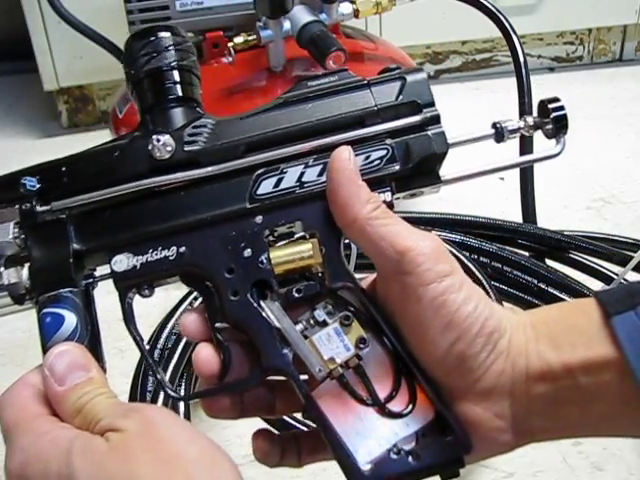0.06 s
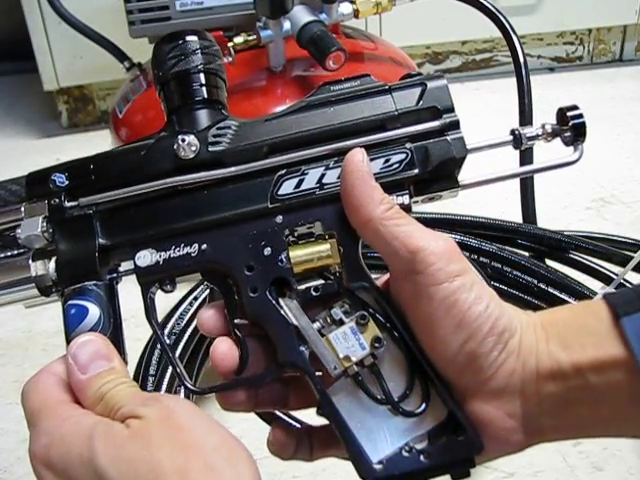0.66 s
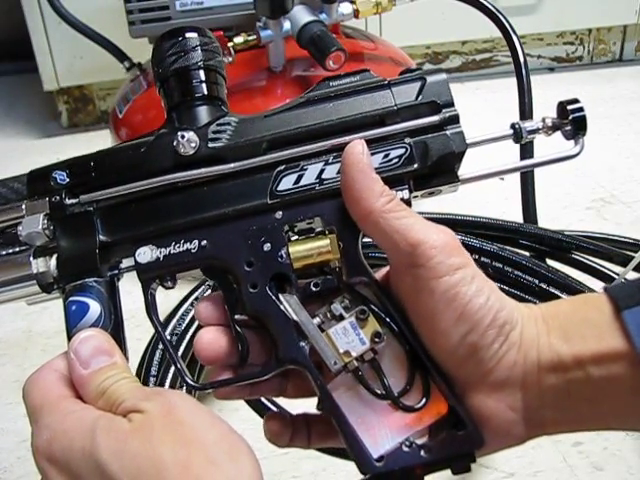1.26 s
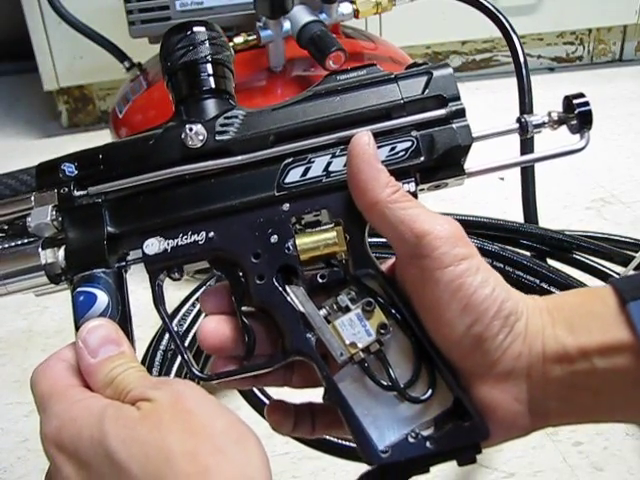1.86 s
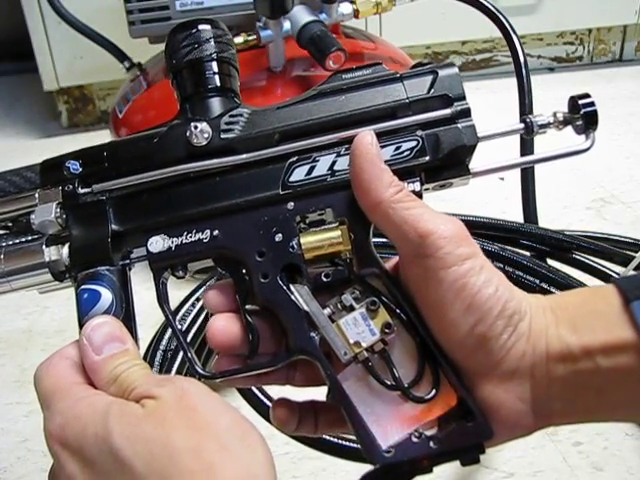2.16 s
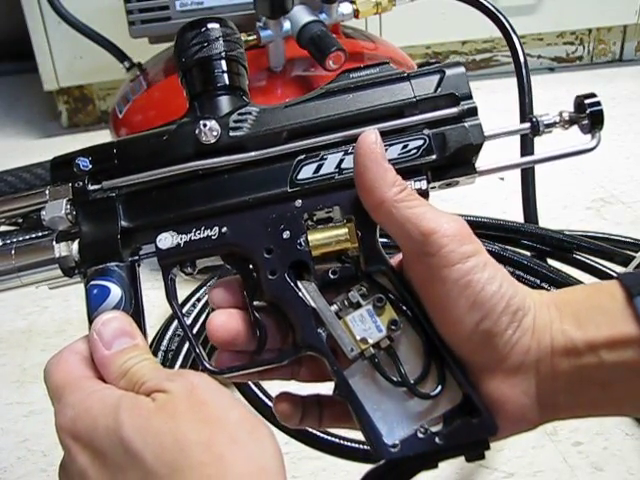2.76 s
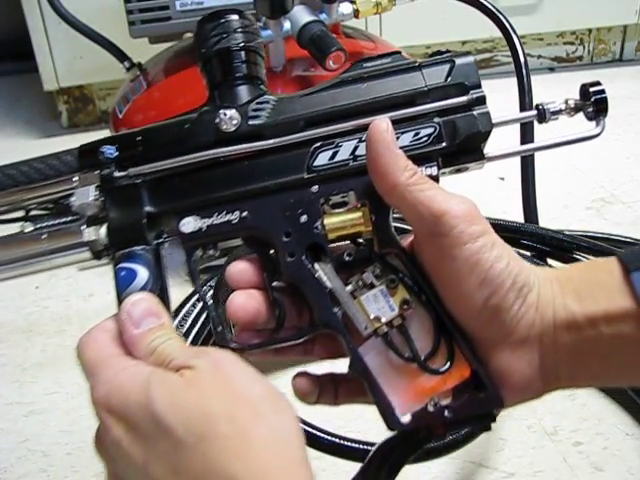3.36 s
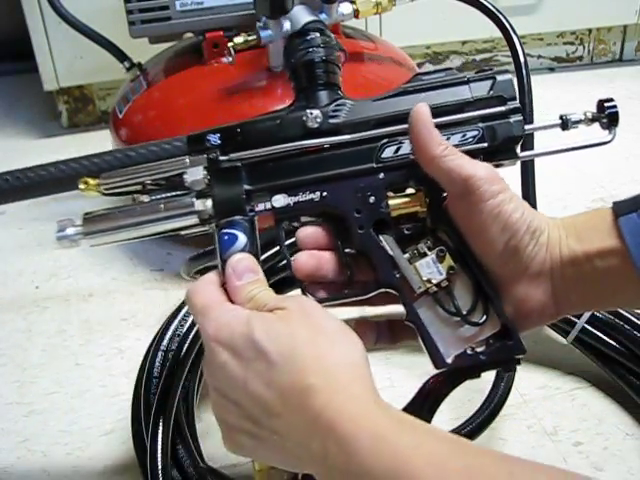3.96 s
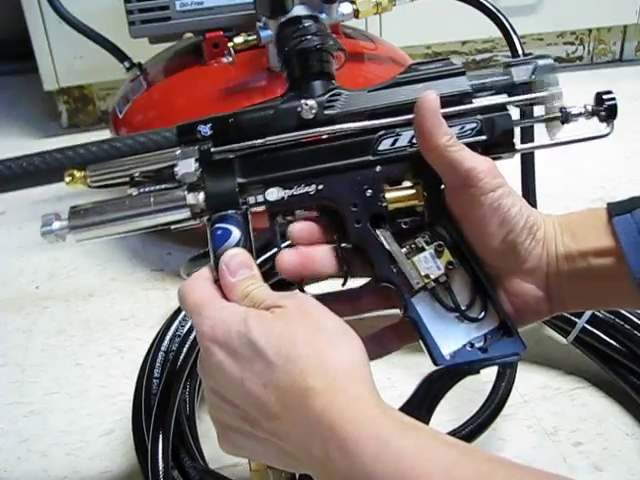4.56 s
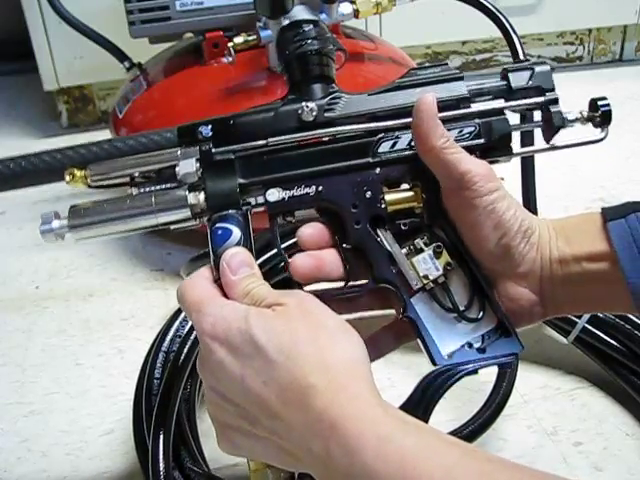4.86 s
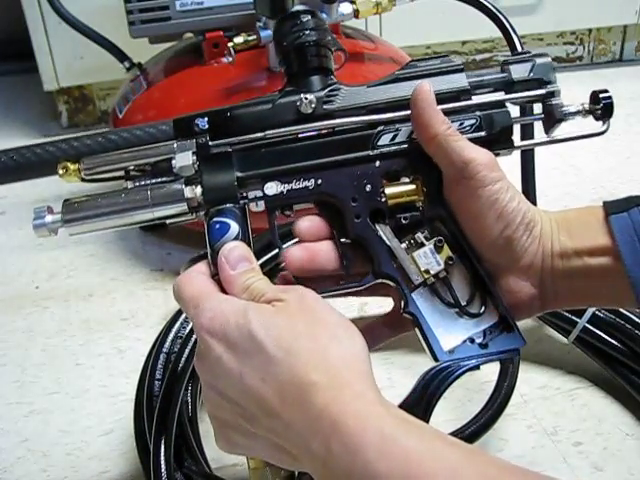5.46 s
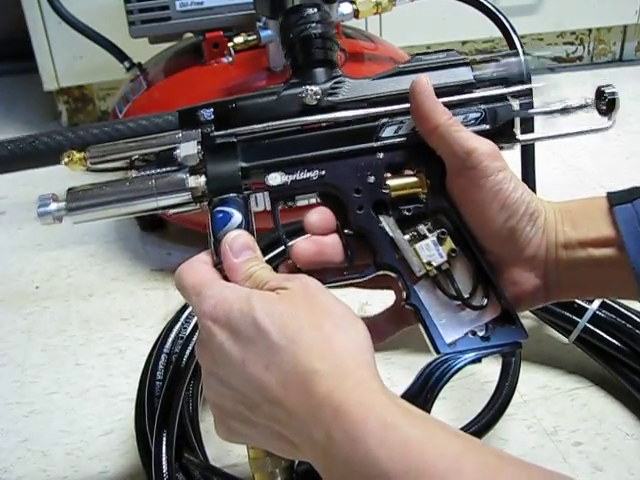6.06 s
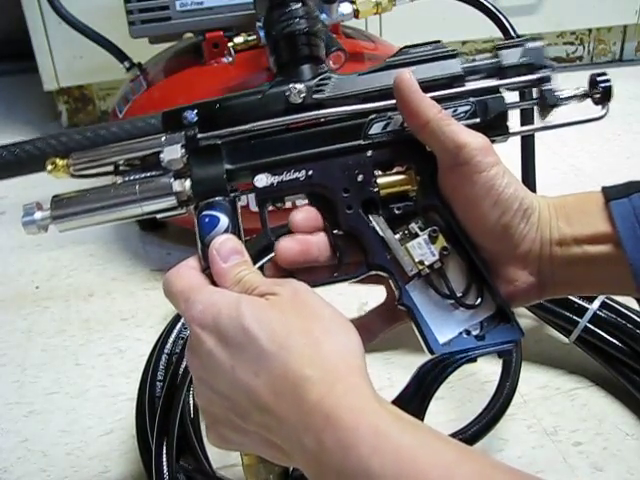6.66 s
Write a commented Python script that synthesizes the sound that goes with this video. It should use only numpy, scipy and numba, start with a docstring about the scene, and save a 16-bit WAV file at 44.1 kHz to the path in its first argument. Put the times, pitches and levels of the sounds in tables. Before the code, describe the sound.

A low compressor rumble and hum fill a small workshop, with faint bumps and a rub of hands on a grip. At about 0.8, 1.6 and 2.4 seconds a paintball marker is dry-fired close to the microphone. Each shot is a sharp pop of compressed air with a brief hiss and a short hollow ring, followed about a tenth of a second later by a tick and a bright metallic clack as the cocking block shuts. The pops overload slightly and duck the rumble, which slowly swells back during a pause with very faint handling. From about 4.4 seconds the marker fires a fast, slightly uneven string of about nineteen shots, seven to nine a second, pops and clacks alternating until about 6.7 seconds. A dull low bump falls among them near 5.7 seconds. The room adds a short, tight reverberation.

```python
"""A low machine rumble and faint handling fill a small workshop; then a pneumatic pump-action paintball
marker is dry-fired close by, three single shots and a fast string. Each trigger pull vents the ram and pops
air from the barrel, exciting resonances of barrel and room. Each release ticks the valve and slams the
cocking block shut, leaving it ringing. The pops overload the microphone, and its gain control ducks the
rumble, which slowly swells back."""
import sys
import numpy as np
from scipy import signal
from scipy.fft import rfft, irfft
from scipy.io import wavfile
from numba import njit

SR = 44100
rng = np.random.default_rng(int(sys.argv[2]) if len(sys.argv) > 2 else 0)


def to_wav(sig):
    """Store sig (one row per channel, or 1-D mono) as 16-bit WAV at the path in sys.argv[1].

    Samples outside -1..1 are clipped; the rate is SR.
    """
    pcm = np.clip(np.atleast_2d(sig), -1, 1) * 32767
    pcm = np.round(pcm).astype(np.int16)
    wavfile.write(sys.argv[1], SR, pcm.T)  # frames by channels


N = 296352
T = np.arange(SR * 6 // 10) / SR  # time axis of one event, in seconds

# Noise spectra of the machinery, venting ram, valve air, block impacts and room tail.
# Each row: frequency in Hz, relative spectral density in dB.
RUMBLE_SPECTRUM = [(20, -13.5), (35, -11), (55, -8.5), (75, -3.5), (110, -15.5), (170, -10.5), (250, -23),
                   (300, -22.5), (380, -21.5), (500, -30), (900, -31.5), (2000, -41.5), (5000, -47),
                   (15000, -54.5)]
VENT_SPECTRUM = [(100, -17.5), (200, -5.5), (500, -0.5), (1000, -2.5), (1800, -0.5), (2600, 2.5), (3600, 4),
                 (5000, 1), (8000, -1.5), (12000, -1.5), (16000, -10)]
VALVE_SPECTRUM = [(150, 3.5), (600, -7.5), (2000, -6), (3500, -1.5), (6000, -0.5), (10000, 0.5), (16000, 3)]
CLACK_SPECTRUM = [(150, -10.5), (800, -11), (1600, -6.5), (2400, -2), (3000, 0.5), (3650, 5.5),
                  (4400, -1.5), (6000, -4), (8500, -1), (12000, -4), (16000, -13.5)]
TAIL_SPECTRUM = [(100, -9), (300, 4.5), (600, -2), (1200, 0), (3500, 0), (8000, 1.5), (16000, 0.5)]
# Machine tones and a thin electronic whine. Each row: frequency in Hz, level in dB.
HUM_TONES = [(56, -62), (93, -68), (120, -68.5), (156, -73), (651, -90), (4086, -103), (7854, -93.5),
             (7881, -94)]
# Hands bumping marker and camera. Each row: start in seconds, level in dB, corner in Hz, T60 in seconds.
KNOCKS = [(0.051, -49.5, 1300, 0.03), (.308, -55, 90, 0.046), (3.079, -56, 700, 0.045),
          (5.734, -15.5, 74, 0.084)]
# Hands rubbing the grip. Each row: centre and half-length in seconds, level in dB, spectral peak in Hz.
RUBS = [(0.357, 0.047, -74.5, 2900), (3.878, 0.065, -75.5, 1900), (4.28, 0.054, -76.5, 1600)]
# Trigger pulls. Each row: time of the pop in seconds, strength in dB.
PULLS = [(0.7538, -1), (1.6205, -5.5), (2.372, -2), (4.3627, -2), (4.5007, -1), (4.6315, -.5), (4.8185, 0),
         (4.9543, 0), (5.1066, 0), (5.225, -1), (5.3329, 0.5), (5.4317, 0), (5.5271, .5), (5.648, 0),
         (5.7765, 0), (5.9556, -1), (6.0762, 0.5), (6.2035, 1), (6.302, -0.5), (6.43, 1.5), (6.5205, -0.5),
         (6.6518, 2)]
# Resonances of barrel and room. Each row: frequency in Hz, level in dB, T60 in seconds.
BOOM_MODES = [(65.4, -15, 0.51), (94, -12.5, .25), (164.7, -6, 0.23), (195.6, 1.5, 0.13),
              (220.4, -0.5, 0.14), (300.6, 1, 0.22), (352.8, -5, 0.21), (377, -7, 0.09), (441, -2, 0.2),
              (469, -1, 0.12), (535, -11.5, 0.37), (655, -5.5, 0.11), (737, -3.5, 0.18), (787, -8.5, 0.28),
              (836, -5, 0.2), (929, -5.5, .2), (1080, -15.5, .15), (1350, -6.5, 0.26), (1430, -6.5, 0.12),
              (1580, -7.5, 0.093), (1726, -6, 0.12), (1818, -4.5, 0.21), (1897, -6.5, 0.29),
              (1955, -5.5, 0.2), (2118, -11.5, 0.12), (2497, -12, 0.12), (2560, -11, 0.22),
              (2720, -8, 0.26)]
# Trigger releases. Each row: time of the valve tick in seconds, strength in dB.
RELEASES = [(0.8616, -0.5), (1.6945, -1), (2.497, -1), (4.4357, 0.5), (4.577, 0), (4.7117, -1),
            (4.9233, .5), (5.064, -1), (5.178, -1), (5.3057, -0.5), (5.3945, 0.5), (5.494, -0.5),
            (5.61, -0.5), (5.7365, -1), (5.9269, -1), (6.0468, 0), (6.157, .5), (6.265, 0), (6.387, 0),
            (6.491, -1), (6.591, 1), (6.7062, 1)]
# Resonances of the cocking block and its rod. Each row: frequency in Hz, level in dB, T60 in seconds.
BLOCK_MODES = [(2470, -6.5, .08), (2678, -4.5, .1), (2820, 4, 0.11), (3330, -1, .11), (3480, 0.5, 0.11),
               (3550, 4, 0.12), (3710, 0.5, .1), (3740, 0, .1), (4100, -6, .12), (5320, -5.5, .12)]
# Early reflections from bench and walls. Each row: delay in seconds, level in dB.
REFLECTIONS = [(.008, -18.5), (0.0131, -16), (.021, -15.5)]
# Reverberation time of the workshop. Each row: frequency in Hz, T60 in seconds.
ROOM_T60 = [(150, 0.22), (600, 0.38), (1500, 0.34), (3600, 0.34), (8000, 0.25), (15000, 0.15)]
# Stereo width of the sound field. Each row: frequency in Hz, side level relative to mid in dB.
STEREO_WIDTH = [(30, -9.5), (60, -18), (200, -22.5), (500, -11.5), (1000, -7.5), (2000, -7), (4000, -2.5),
                (12000, 0)]
# Left and right microphone capsules. Each row: bass roll-off in Hz, gain in dB.
CAPSULES = [(12, -2.13), (42, -1.6)]

PULSE_CENTRE_S = .002


def undb(db):
    """Amplitude ratio of a level in decibels."""
    return 10 ** (np.asarray(db) / 20)


def along(points, f):
    """Interpolation of (Hz, value) rows on a log-frequency axis."""
    hz, value = np.transpose(points)
    return np.interp(np.log(np.maximum(f, 1)), np.log(hz), value)


def fade(t60):
    """Exponential damping, 60 dB down after t60 seconds."""
    return np.exp(-np.log(1000) * T / t60)


def add(out, s, sound):
    """Superposition: a sound joins the mix at s seconds."""
    i = int(np.clip(round(s * SR), 0, N))
    out[:, i:i + sound.shape[-1]] += sound[..., :N - i]


def noise(spectrum, size=len(T)):
    """Diffuse-field noise of unit rms: the channels are coherent in the bass, unrelated in the treble."""
    f = np.arange(size // 2 + 1) * SR / size
    mid, side = rfft(rng.standard_normal((2, size)))
    width = undb(along(STEREO_WIDTH, f))
    channels = np.array([mid + width * side, mid - width * side]) / np.hypot(1, width)
    x = irfft(channels * undb(along(spectrum, f)), size)
    return x / x.std()


def ring(hz, t60):
    """Free decay of one mode; the stereo width sets the phase difference between channels."""
    lag = np.arctan(undb(along(STEREO_WIDTH, hz))) * rng.choice([-1, 1]) * np.array([[1], [-1]])
    return np.sin(2 * np.pi * hz * T + rng.uniform(0, 2 * np.pi) + lag) * fade(t60)


def burst(spectrum, rise, hold, t60):
    """Broadband noise of turbulence or impact that builds, holds and decays; times in seconds."""
    decay = np.exp(-np.log(1000) * np.maximum(T - hold, 0) / t60)
    return noise(spectrum) * (1 - np.exp(-T / rise)) * decay


def pulse(width_s, hz):
    """A Gaussian pressure pulse with rarefaction at its centre."""
    t = T - PULSE_CENTRE_S
    return -np.exp(-(t / width_s) ** 2) * np.cos(2 * np.pi * hz * t)


def machinery():
    """Running machines radiate low noise and steady tones, which waver by slight phase modulation."""
    t = np.arange(N) / SR
    out = undb(-63) * noise(RUMBLE_SPECTRUM, size=N)
    knots = np.arange(0, t[-1] + 1, 1 / 8)
    for hz, db in HUM_TONES:
        waver = np.interp(t, knots, rng.standard_normal(len(knots)))
        out += undb(db) * np.sqrt(2) * np.sin(2 * np.pi * hz * t + .5 * waver)
    return out


def knocks():
    """Soft impacts of the hands put their energy mostly below a corner frequency."""
    out = np.zeros((2, N))
    for s, db, corner_hz, t60 in KNOCKS:
        thud = noise([(corner_hz, 0), (corner_hz * 20, -45), (SR, -90)])
        add(out, s, undb(db) * thud * fade(t60) * (1 - np.exp(-T / .0019)))
    return out


def rubs():
    """Sliding friction of skin on the grip gives short, soft swells of noise."""
    out = np.zeros((2, N))
    for s, half_s, db, hz in RUBS:
        swell = np.exp(-((T - T.mean()) / half_s) ** 2)
        friction = noise([(hz / 4, -6), (hz, 0), (hz * 2, -13), (hz * 6, -24)])
        add(out, s - T.mean(), undb(db) * swell * friction)
    return out


def shots():
    """Compressed air expands: vent hiss and hammer click come almost together, then the barrel pops."""
    out = np.zeros((2, N))
    hammer_lead_s, vent_lead_s = .0042, .0048
    hammer = undb(-9) * pulse(.000091, hz=1100)
    pop = undb(-1) * pulse(.00055, hz=1350) + undb(-10) * pulse(.0005, hz=0)
    last_s = -1
    for s, db in PULLS:
        # the valve chamber refills slowly, so a shot after a rest opens harder
        charge = 1 - np.exp(-((s - last_s) / .4) ** 2)
        last_s = s
        faint_hiss = (noise(VALVE_SPECTRUM) * fade(.04))[:, ::-1]  # swells briefly just before the shot
        vent = burst(VENT_SPECTRUM, rise=.00066, hold=.016, t60=.18)
        add(out, s - vent_lead_s - T[-1], undb(-25.5) * charge * faint_hiss)
        add(out, s - vent_lead_s, undb(db - 9.5) * vent)
        add(out, s - hammer_lead_s - PULSE_CENTRE_S, (charge + .1) * hammer)
        add(out, s - PULSE_CENTRE_S, undb(db) * pop)
    return out


def boom():
    """Impulse excitation: every pop rings the same modes of barrel and room."""
    out = np.zeros((2, N))
    modes = sum(undb(db) * ring(hz, t60) for hz, db, t60 in BOOM_MODES)
    onset = 1 - np.exp(-T / .00022)
    for s, db in PULLS:
        add(out, s, undb(db - 18.5) * modes * onset)
    return out


def block_travel(s):
    """Closing time of the block in seconds: fast firing drains the supply pressure and slows the ram."""
    rested_s, slowing_s_per_shot, recovery_s = .016, .00045, 1.0
    air_spent = sum(np.exp((fired - s) / recovery_s) for fired, _ in PULLS if fired < s)
    return rested_s + slowing_s_per_shot * air_spent


def releases():
    """Pressure drives the return stroke: the valve ticks and spits, the rod jerks, the block slams."""
    out = np.zeros((2, N))
    tick = pulse(.000084, hz=0)
    for s, db in RELEASES:
        spit = burst(VALVE_SPECTRUM, rise=.0002, hold=.0021, t60=.04)
        jerk = burst(CLACK_SPECTRUM, rise=.00046, hold=.00079, t60=.027)
        slam = burst(CLACK_SPECTRUM, rise=.00045, hold=.003, t60=.037)
        add(out, s - PULSE_CENTRE_S, undb(db - 2.5) * tick)
        add(out, s, undb(db - 12.5) * spit)
        add(out, s + .0053, undb(db - 8.5) * jerk)
        add(out, s + block_travel(s), undb(db - 5.5) * slam)
    return out


def clink():
    """Free vibration of the block after it shuts, its modes a little different each time."""
    out = np.zeros((2, N))
    scatter_db, detune = 2, 1 / 30
    for s, strength_db in RELEASES:
        metal = 0
        for hz, db, t60 in BLOCK_MODES:
            amplitude = undb(db + scatter_db * rng.standard_normal())
            metal += amplitude * ring(hz * rng.uniform(1 - detune, 1 + detune), t60)
        add(out, s + block_travel(s), undb(strength_db - 26) * metal)
    return out


def squeak(centre_s=4.14, hz=1400):
    """Friction of the shifting grip gives one faint squeak of narrow-band noise."""
    out = np.zeros((2, N))
    band = noise([(hz * .92, -60), (hz, 0), (hz * 2.2, -60)])
    swell = np.exp(-((T - T.mean()) / .009) ** 2)
    add(out, centre_s - T.mean(), undb(-72) * swell * band)
    return out


def room(x):
    """Reverberation: dull early reflections and a diffuse tail that lasts longest in the midrange."""
    tail_spectrum = rfft(noise(TAIL_SPECTRUM))
    f = np.arange(len(T) // 2 + 1) * SR / len(T)
    centres = [hz for hz, _ in ROOM_T60]
    response = 0
    for share, (_, t60) in zip(np.eye(len(centres)), ROOM_T60):
        band = along(list(zip(centres, share)), f)  # overlapping triangular bands
        response += irfft(tail_spectrum * band, len(T)) * fade(t60)
    response *= np.clip((T - .004) / .0037, 0, 1)  # the tail builds after a short gap
    response /= np.sqrt(np.sum(response ** 2) / 2)
    out = undb(-12) * signal.fftconvolve(x, response, axes=1)[:, :N]
    dull = signal.sosfilt(signal.butter(1, 2500, fs=SR, output="sos"), x)
    for delay, db in REFLECTIONS:
        add(out, delay, undb(db) * dull)
    return out


def scene():
    """Direct sound, reverberation, resonances and background rumble add linearly."""
    marker = shots() + releases() + knocks() + squeak() + rubs()
    return marker + room(marker) + boom() + clink() + machinery()


@njit
def gain_control(over_db, max_db, attack_s, release_s):
    """Compression: the gain in dB drops fast on peaks over the ceiling, then creeps back up."""
    out, gain = np.empty(len(over_db)), max_db
    for i in range(len(over_db)):
        if gain > -over_db[i]:
            gain += (-over_db[i] - gain) / (attack_s * SR)
        else:
            gain += (max_db - gain) / (release_s * SR)
        out[i] = gain
    return out


def record(dry):
    """Saturation: two unequal capsules overload on the pops, then gain control and a low-pass follow."""
    overload, ceiling_db, cutoff_hz = .59, -8, 15900
    x = np.array([undb(db) * signal.sosfilt(signal.butter(1, hz, "high", fs=SR, output="sos"), channel)
                  for channel, (hz, db) in zip(dry, CAPSULES)])
    x = overload * np.tanh(x / overload)
    peak_db = 20 * np.log10(np.abs(x).max(axis=0) + 1e-9)
    x *= undb(gain_control(peak_db - ceiling_db, max_db=28.0, attack_s=.001, release_s=1.29))
    return signal.sosfilt(signal.ellip(8, .2, 70, cutoff_hz, fs=SR, output="sos"), np.clip(x, -1, 1))


dry = scene()
out = record(dry)
to_wav(out)
```